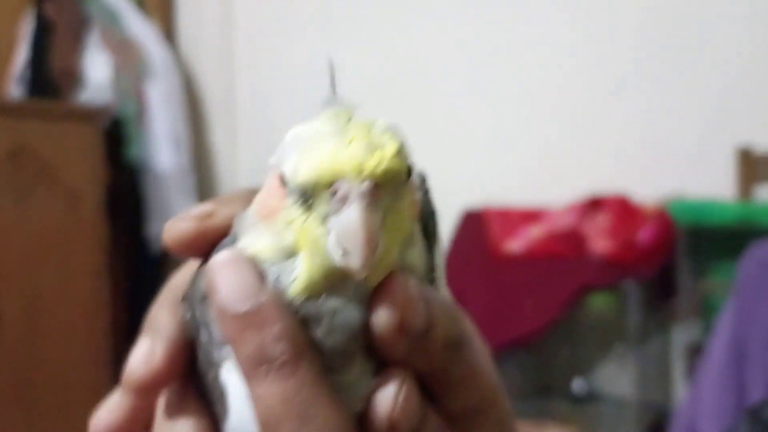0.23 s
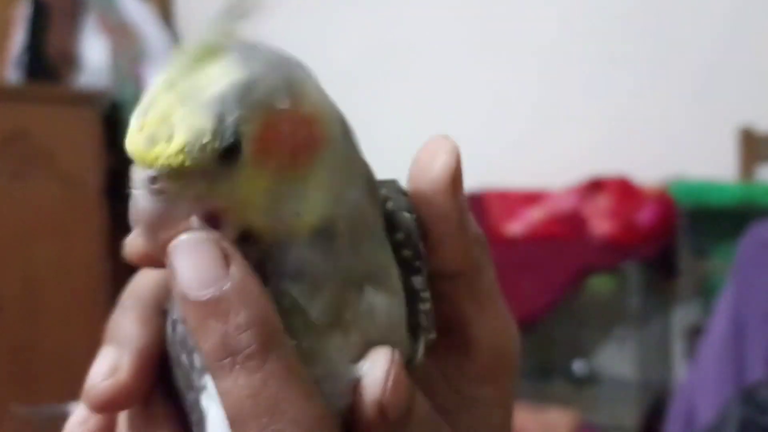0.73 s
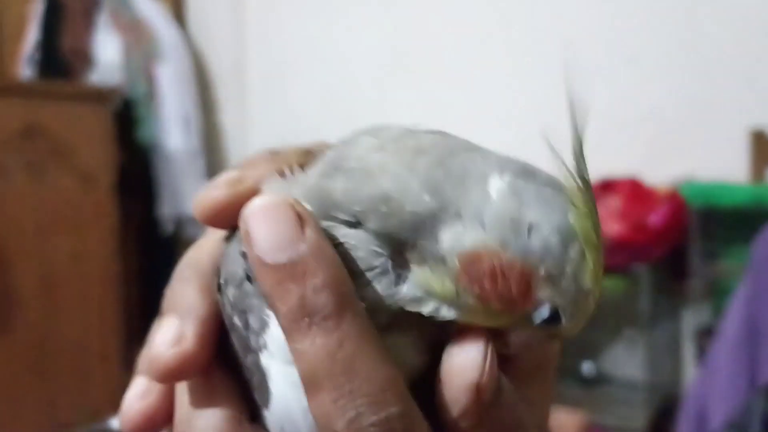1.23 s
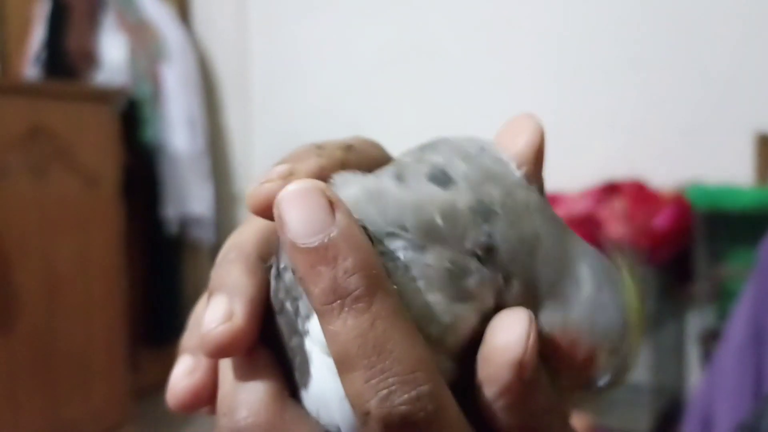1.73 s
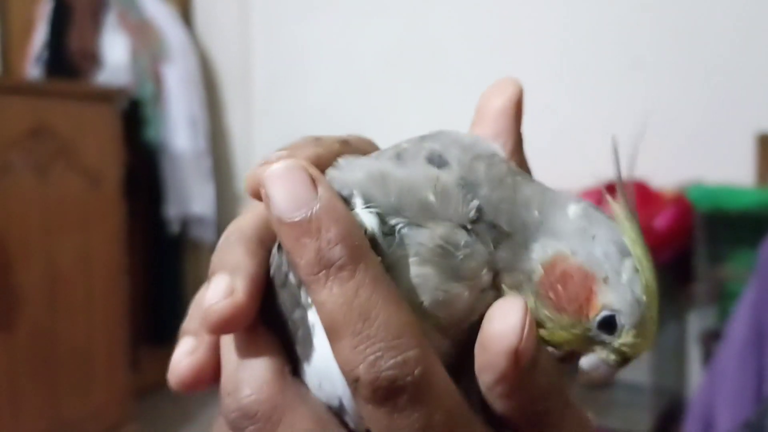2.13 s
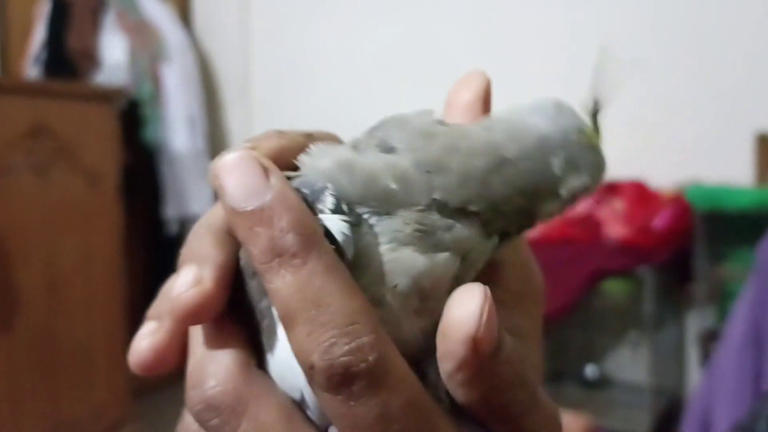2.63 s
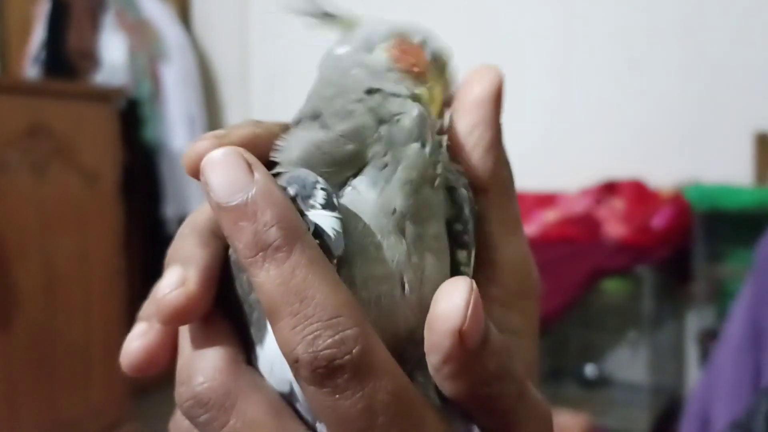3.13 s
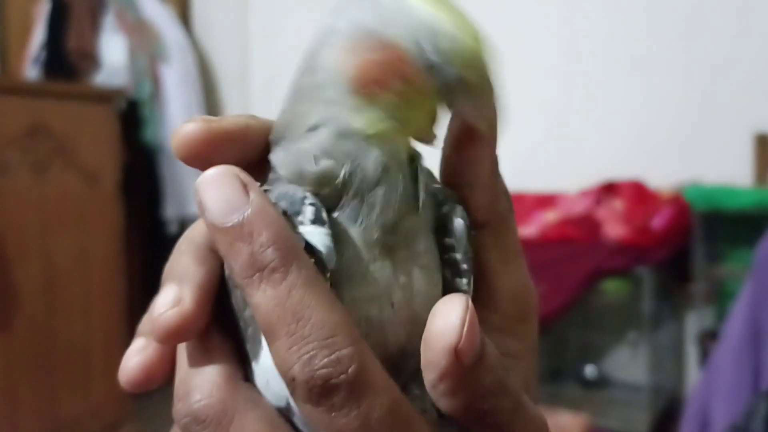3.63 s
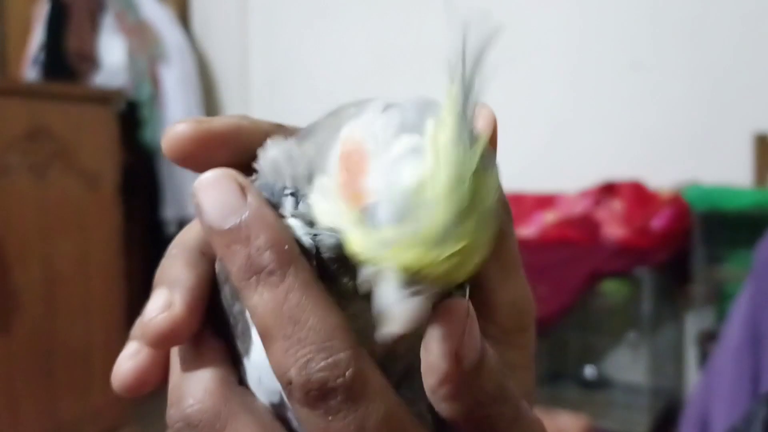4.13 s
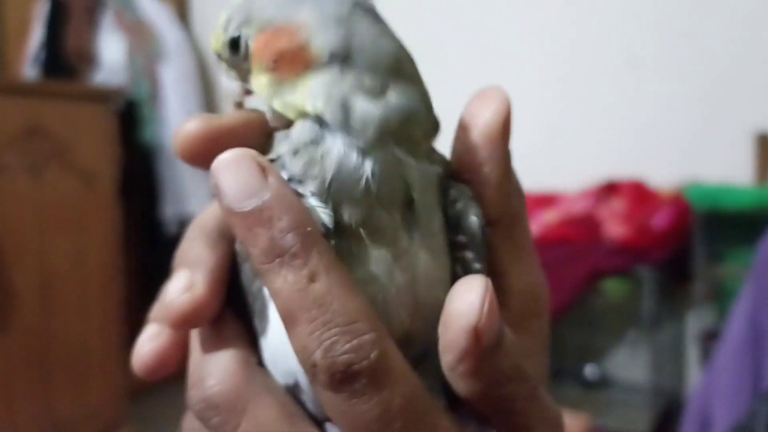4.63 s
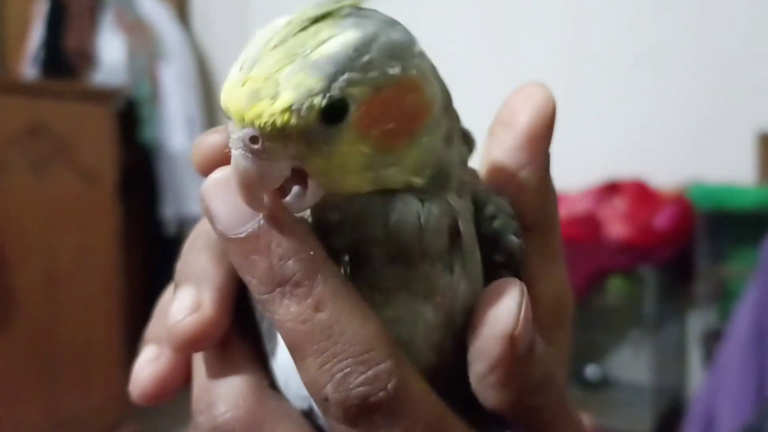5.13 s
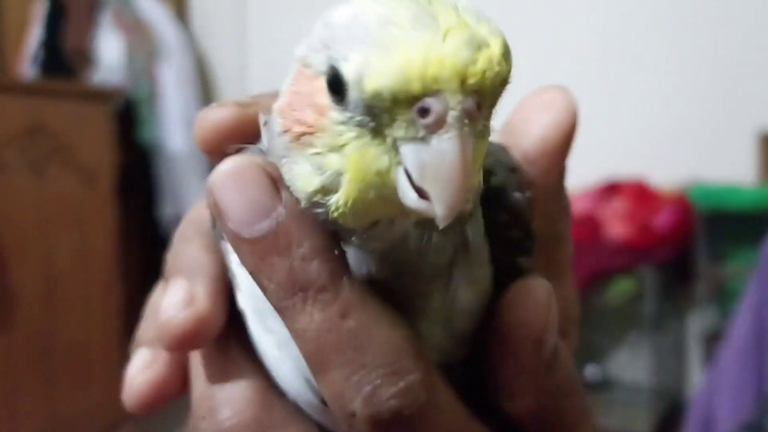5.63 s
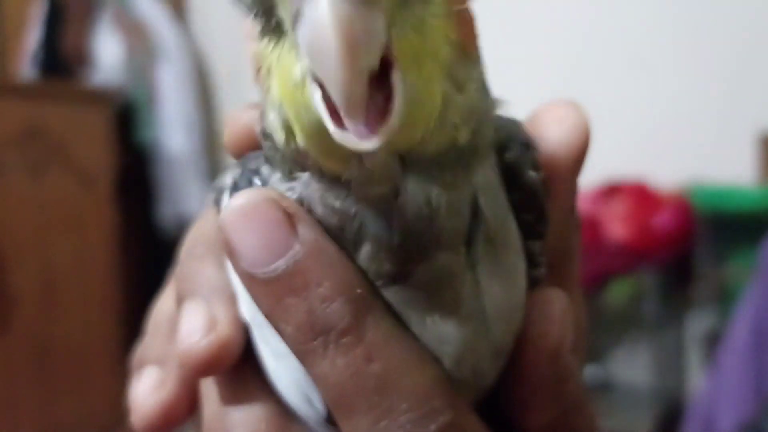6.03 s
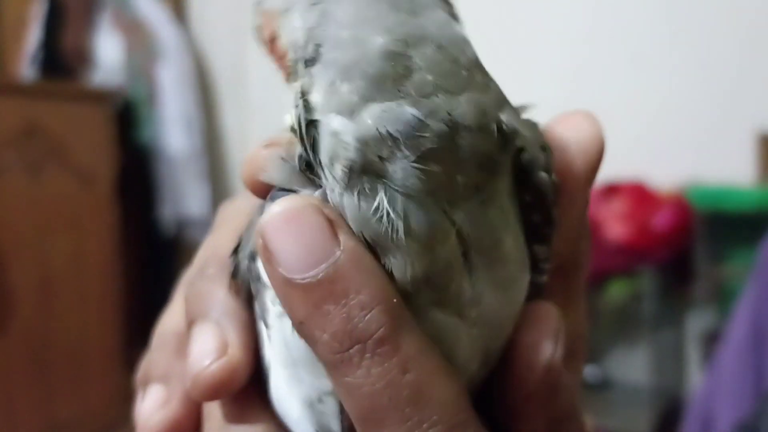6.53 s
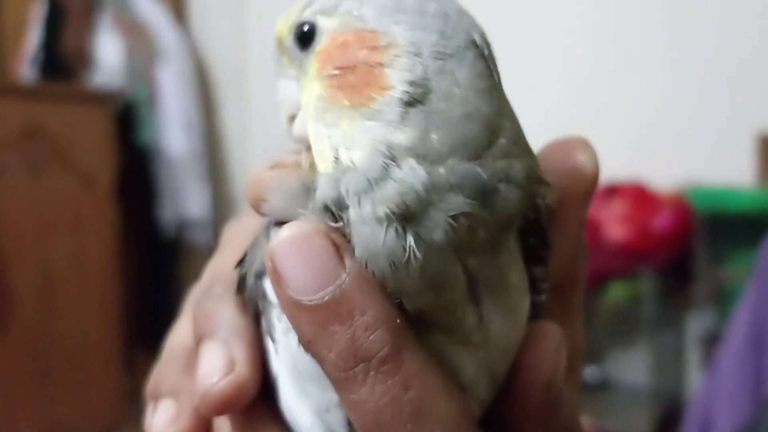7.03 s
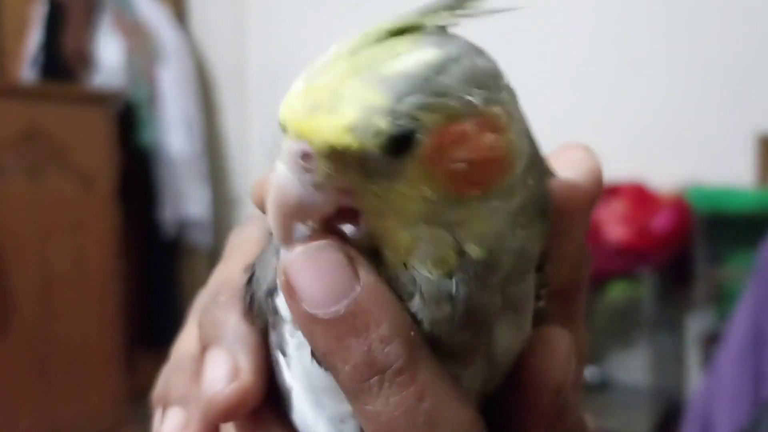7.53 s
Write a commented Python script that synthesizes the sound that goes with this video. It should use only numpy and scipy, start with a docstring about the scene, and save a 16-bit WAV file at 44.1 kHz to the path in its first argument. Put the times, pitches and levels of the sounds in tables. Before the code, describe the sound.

A cockatiel held in a hand gives one short, shrill, trilling squawk, then hisses in several breathy bursts, some starting with a tiny squeak. Near the end a swelling hiss runs into a harsh, broken squawk and a brief yelp. Light beak and claw ticks and faint feather rubbing fill the pauses. The microphone is close, in a small room with a low rumble.

```python
"""A small room: a hand-held cockatiel squawks, hisses in long bursts and squawks again, close by.
The hiss is air rushing through three throat resonances, with brief squeaks and thin wheezes;
the squawks are a fast trill of a harmonic voice. Beak and claws tick, feathers rub on the fingers,
and a faint whine falls slowly over the room's rumble."""
import sys
import numpy as np
from scipy import signal
from scipy.fft import rfft, irfft, next_fast_len
from scipy.io import wavfile
from scipy.ndimage import map_coordinates

SR = 44100
rng = np.random.default_rng(int(sys.argv[2]) if len(sys.argv) > 2 else 0)


def unload_wav(signal):
    """Save mono or channel-first audio to the path in sys.argv[1] as 16-bit WAV at rate SR, clipped to [-1, 1]."""
    wavfile.write(
        sys.argv[1],
        SR,
        np.round(np.clip(np.atleast_2d(signal).T, -1, 1) * 32767).astype(np.int16),
    )


N = 343098
TIME = np.arange(N) / SR
TOP_HZ = 15650

# Each row: start, end and attack in seconds; level, swell, brightening, middle resonance and
# high resonance in dB; resonance shift as a ratio; whistle peak and fizz in dB.
HISS_BURSTS = [(0.706, 0.725, .002, -32, -2, 0.5, -10.5, -2.5, 1.01, 5, 0),
               (0.756, 1.003, .018, -33, 0.5, 7.5, -5, -5.5, 1.02, 5, 2.5),
               (1.034, 1.714, .02, -31, -2, -1.5, 2.5, -0.3, 1.019, 3, 0),
               (1.991, 2.026, .01, -35.5, -2.5, -1, -3, -6, 0.91, -8.5, -5.5),
               (3.164, 4.023, 0.0023, -34.5, 6, 6, -1.5, -.5, 0.9894, 7.5, -7),
               (4.152, 4.17, 0.0053, -34.5, -0.5, 5.5, -7, -2, .99, -1, 2.5),
               (4.347, 4.962, 0.0019, -34, -1, 2, -3, -3, 1.012, 2.5, -3),
               (6.214, 6.459, .009, -34, -2, 6.5, -7.5, -7, .985, 0, -6),
               (6.506, 6.823, 0.072, -32, 9.5, 8.5, -0.5, -1, 1.015, 12, -7.5)]


def amp(db):
    return 10 ** (np.asarray(db) / 20)


def unit(x):
    return x / np.sqrt(np.mean(x ** 2) + 1e-20)


def along(points, hz):
    """(Hz, value) points, interpolated on a log axis."""
    knots_hz, values = np.transpose(points)
    return np.interp(np.log(hz + 1), np.log(knots_hz + 1), values)


def curves(rows, t=TIME):
    """Each column after the time, read at times t."""
    knots_s, *columns = np.transpose(rows)
    return [np.interp(t, knots_s, column) for column in columns]


def swells(rows, t=TIME):
    """One Gaussian bump per (centre s, half length s, height) row."""
    return sum(height * np.exp(-((t - s) / half) ** 2) for s, half, height in rows)


def wobble(knots_per_s):
    """Smooth random curve."""
    knots = rng.standard_normal(int(N * knots_per_s / SR) + 4)
    return map_coordinates(knots, [TIME * knots_per_s])


def filtered(x, response):
    """x through a complex frequency response."""
    size = next_fast_len(N + SR // 2)
    return irfft(rfft(x, size) * response(np.fft.rfftfreq(size, 1 / SR)), size)[..., :N]


def noise(spectrum):
    """Stereo noise of rms 1, alike in the bass, unrelated in the treble."""
    # Each row: frequency in Hz, left-right correlation.
    likeness = [(60, 0.89), (180, 0.86), (550, 0.65), (1650, -0.39), (4970, 0.019), (15000, -0.065)]

    def mid_side_gains(hz):
        angle = np.arccos(np.clip(along(likeness, hz), -1, 1)) / 2
        return amp(along(spectrum, hz)) * [np.cos(angle), np.sin(angle)]

    mid, side = filtered(rng.standard_normal((2, N)), mid_side_gains)
    return unit(np.array([mid + side, mid - side]))


def ports(hz, lead_ms, left_db):
    """Constant-power response of two microphone ports to a near source."""
    # The right port rings more near 4 and 6.5 kHz. Each row: frequency in Hz, left over right in dB.
    imbalance = [(750, 0), (1900, -4), (2800, -1.5), (3900, -13.5), (4900, -9), (6400, -14), (7600, -15.5),
                 (10500, 10.5), (14000, -1)]
    ratio = amp(along(imbalance, hz) + left_db)
    lead = np.exp(1j * np.pi * hz * lead_ms / 1000)
    return np.array([ratio * lead, 1 / lead]) * np.sqrt(2 / (1 + ratio ** 2))


def background(rumble_db=-53, air_db=-62):
    """The room at rest: low rumble, faint steady hiss."""
    # Each row: frequency in Hz, relative level in dB.
    rumble = [(15, -75), (25, -48), (59, -27.5), (72, -10.5), (91, 1.5), (284, -9.5), (440, -11.5),
              (500, -14), (551, -19.5), (659, -17.5), (1200, -23.5), (1560, -57.5), (2640, -120)]
    air = [(700, -20), (1300, -0.5), (2200, -2), (3200, -2), (4800, -13), (6500, -9), (7600, -19.5),
           (9500, -19), (12000, -11.5), (15500, -13)]
    return amp(rumble_db) * noise(rumble) + amp(air_db) * noise(air)


def voice(call, jitter, rasp_db, swing, dip_db=0, overtone_db=0, subharmonic_db=-60):
    """Pitch and brightness arch on each trill beat; harmonics sweep through the throat's resonances."""
    # Each row: frequency in Hz, gain in dB.
    tract = [(1400, -11), (2000, -7.5), (2900, -6.5), (3400, -8), (4150, 0.5), (4900, -7), (6200, -5),
             (7200, -16), (8300, -19), (9300, -34), (11500, -22.5), (15000, -35)]
    start, end = call[0][0], call[-1][0]
    crest_hz, level_db, beats_per_s = curves(call)
    trough = np.cos(np.pi * np.cumsum(beats_per_s * (TIME > start)) / SR) ** 2
    pitch_hz = crest_hz * (1 - swing * trough ** 1.1) * (1 + jitter * wobble(900))
    gate = np.clip(np.minimum(TIME - start, end - TIME) / 0.0019, 0, 1)
    on = gate > 0
    harmonic = np.arange(1, 9)[:, None]
    partial_hz = harmonic * pitch_hz[on]
    phase = 2 * np.pi * np.cumsum(pitch_hz[on]) / SR
    sag_db = dip_db * trough[on]
    effort_db = np.where(harmonic > 1, overtone_db - sag_db, -.45 * sag_db)
    gains = amp(along(tract, partial_hz) + effort_db) * (partial_hz < TOP_HZ)
    partials = gains * np.sin(harmonic * phase)
    # Air leaks past the membranes as a rasp, strongest at the onset.
    leak = rng.standard_normal(N)
    rasp = unit(filtered(leak, lambda hz: amp(along(tract, hz)) * hz ** 2 / (hz ** 2 + 900 ** 2)))
    onset_db = 13.5 * np.exp(-np.abs(TIME - start) / 0.033)
    sound = rasp * amp(rasp_db + onset_db)
    subharmonic = amp(subharmonic_db) * np.sin(phase / 2)  # uneven cycles
    sound[on] += partials.sum(axis=0) + subharmonic
    return sound * gate * amp(level_db)


def squawks():
    """A clear trill; later a harsh, broken one that ends in a yelp."""
    # Each row: time in seconds, top pitch in Hz, level in dB, trill beats per second.
    clear = [(.0165, 1460, -17.5, 87), (.05, 1809, -6.5, 88), (.082, 2056, -5.5, 65),
             (.125, 2103, -6.5, 86), (.161, 2136, -6.5, 79), (.178, 2050, -16.5, 72)]
    harsh = [(6.575, 1557, -21.5, 63), (6.597, 1768, -11, 71.4), (6.622, 2033, -6, 80),
             (6.644, 2207, -13, 51), (6.659, 2912, -12.5, 44), (6.669, 2135, -15.5, 43),
             (6.682, 2056, -11, 44), (6.704, 1864, -12.5, 46.6), (6.725, 1782, -20.5, 48),
             (6.766, 1684, -17.5, 48), (6.79, 1710, -32, 48)]
    yelp = [(6.829, 1835, -10, 61.3), (6.853, 1692, -15, 61.6)]
    calls = voice(clear, jitter=.008, rasp_db=-33, swing=.15, dip_db=11.5)
    calls += voice(harsh, jitter=.018, rasp_db=-22, swing=.14, dip_db=10.5, subharmonic_db=-32.5)
    calls += voice(yelp, jitter=.018, rasp_db=-25.5, swing=.04, overtone_db=-8.5)
    return filtered(calls, lambda hz: ports(hz, lead_ms=-.15, left_db=0))


def clicks(rows, spectrum, t60_s):
    """Tiny contacts: cracks of noise that die at once."""
    envelope = sum(amp(db - 60 * np.abs(TIME - s) / t60_s) * (TIME >= s) for s, db in rows)
    return envelope * noise(spectrum)


def ticks():
    """Beak and claws tick sharply; the tongue unsticks with a lower click as a hiss begins."""
    # Each row: time in seconds, relative level in dB.
    contacts = [(0.3055, -33.5), (1.7729, -26), (2.1072, -42), (2.6835, -47), (2.81, -37), (5.1406, -27.5),
                (6.0897, -29.5), (7.623, -34.5), (7.6925, -42.5), (7.7255, -43)]
    tongue = [(.705, -38), (3.163, -47.5), (4.147, -41.5), (4.3425, -35.5), (6.2055, -28.5)]
    # Each row: frequency in Hz, relative level in dB.
    beak = [(300, -12.5), (1500, -3), (4000, -4), (6500, 0), (9000, -12.5), (12000, 2.5), (16000, -9)]
    mouth = [(300, -29.5), (900, -4.5), (1600, -1), (3300, 2.5), (4800, -5), (7000, -6.5), (9000, -25.5),
             (15000, -27.5)]
    return amp(-1) * clicks(contacts, beak, t60_s=.007) + clicks(tongue, mouth, t60_s=.0066)


def handling(grain_db=4):
    """Feather barbs catch on the skin in grains; the grip shifts once with a low rub."""
    # Each row: centre and half length in seconds, level in dB.
    rubs = [(.32, 0.03, -55), (.655, 0.049, -54.5), (1.8, 0.023, -60.5), (2.12, 0.028, -61),
            (4.11, 0.005, -53.5), (5.06, 0.071, -52.5), (5.19, 0.0154, -56), (5.41, 0.088, -61),
            (6.125, 0.039, -51.5), (7.7, 0.068, -58.5)]
    grip_shifts = [(.89, .11, -43)]
    # Each row: frequency in Hz, relative level in dB.
    feathers = [(500, -27), (2400, -1.5), (4600, -10), (6200, 1.5), (8000, -13.5), (12300, -4),
                (16000, -16)]
    grip = [(40, -49), (110, -8.5), (170, 2.5), (260, -10.5), (600, -10.5), (2000, -60.5)]

    def strokes(rows):
        return swells([(s, half, amp(db)) for s, half, db in rows])

    grains = unit(noise(feathers) * amp(grain_db * wobble(550)))
    return strokes(rubs) * grains + strokes(grip_shifts) * noise(grip)


def squeaks(beats_per_s=62):
    """The voice catches in a short, rough glide as the air starts or stops."""
    # Each row: start and length in seconds, pitch and glide in Hz, level in dB.
    catches = [(0.705, .03, 1450, 62.5, -22.5), (3.167, .03, 1470, 90, -34), (4.149, .03, 1490, 87, -23.5),
               (4.343, .028, 1380, 243.5, -19.5), (4.997, .016, 2140, -190, -23)]
    sound = 0
    for start, length, pitch_hz, glide_hz, db in catches:
        call = [(start, pitch_hz, db, beats_per_s), (start + length, pitch_hz + glide_hz, db, beats_per_s)]
        sound += voice(call, jitter=.02, rasp_db=-31.5, swing=.03, overtone_db=-20, subharmonic_db=-26.5)
    return filtered(sound, lambda hz: ports(hz, lead_ms=.2, left_db=2.5))


def airflow(bursts, release_db_per_s=521.5):
    """Gain of the breath: each burst rises, swells or sags evenly, then stops quickly."""
    flow = 0
    for start, end, attack_s, level_db, swell_db, *_ in bursts:
        rise = 1 - np.exp(-np.maximum(TIME - start, 0) / attack_s)
        progress = np.clip((TIME - start) / (end - start), 0, 1) - .5
        release_db = release_db_per_s * np.maximum(TIME - end, 0)
        flow += rise * amp(level_db + swell_db * progress - release_db)
    return flow


def throat_setting(t):
    """Each hiss has its own throat shape; its brightness ramps from start to end."""
    knots = []
    for start, end, _, _, _, bright_db, middle_db, high_db, *held in HISS_BURSTS:
        for s, tilt_db in ((start, -bright_db / 2), (end, bright_db / 2)):
            knots.append((s, middle_db + tilt_db, high_db + tilt_db, *held))
    return curves(knots, t)


def hand_echo(hz, t, delay_s=0.001418, wander=0.13, echo_db=-9):
    """A close echo off the fingers ripples the spectrum; its delay wanders at random."""
    drift = np.array([np.interp(t, TIME, wobble(3)) for port in range(2)])
    lag_s = delay_s * (1 + wander * drift)
    echo = amp(echo_db) * np.exp(-2j * np.pi * hz * lag_s[:, None])
    return (1 + echo) / np.hypot(1, amp(echo_db))


def hiss(flutter_db=-0.26, waver=0.017, whistle_hz=1660, whistle_width_hz=140, fizz_hz=9000):
    """Turbulent air through three sliding throat resonances; more effort is brighter."""
    # Low, middle and high resonance. Each point: frequency in Hz, gain in dB.
    resonances = [
        [(150, -32), (450, -20), (750, -12), (1150, -2.5), (1350, -8.5), (1700, -1), (2150, -4), (2900, -8.5),
         (4000, -53.5)],
        [(1800, -54.5), (3000, -13.5), (3600, -2.5), (4100, -3), (4700, -19), (6500, -53)],
        [(3500, -61), (5100, -11), (5900, -3), (6650, 3.5), (7300, -9), (8300, -34.5), (9000, -27.5),
         (10300, -14.5), (11300, -25.5), (13300, -18.5), (15500, -45)],
    ]
    # Share of the sink that each resonance follows.
    sink_shares = (.25, 0.3, 0.8)
    # The bird pushes or eases off. Each row: centre and half length in seconds, effort in dB.
    pushes = [(.945, 0.021, 3.5), (1.115, 0.029, 3.5), (1.24, 0.014, -1.5), (1.6, 0.027, -2),
              (3.41, 0.043, 2), (3.54, 0.05, -2.5), (3.85, 0.062, 2.5), (4.52, 0.12, 5),
              (4.71, 0.036, -3.5), (6.72, 0.014, -3)]
    # The beak narrows. Each row: centre and half length in seconds, sink as a fraction of frequency,
    # change of the high resonance in dB.
    narrowings = [(1.44, 0.23, 0.091, -4.5), (1.512, 0.05, 0.077, -9.5), (2.03, 0.044, 0.21, -1),
                  (3.182, .065, 0.2, -16.5), (3.41, 0.081, 0.056, 1.5), (4.51, .06, 0.11, -7),
                  (4.84, 0.11, 0.051, -1)]
    # The fizz flares. Each row: centre and half length in seconds, boost in dB.
    sprays = [(1.67, .06, 12), (3.9, 0.26, 5)]
    # Where the head points. Each row: time in seconds, left lead in ms, left over right in dB.
    head = [(.95, .27, 6.5), (1.27, .11, -1.7), (2.02, .055, -1.5), (3.2, 0.14, 0.1), (4.15, .135, 0.5),
            (4.5, .23, 5), (6.5, .31, 7), (6.6, -.12, 1), (6.8, -.15, 0)]

    jet = rng.standard_normal(N) * airflow(HISS_BURSTS) * amp(swells(pushes) + flutter_db * wobble(70))
    hz, t, jet_spectra = signal.stft(jet, SR, nperseg=256)
    hz = hz[:, None]
    middle_db, high_db, shift, whistle_db, fizz_db = throat_setting(t)
    push_db = swells(pushes, t)
    sink = swells([(s, half, share) for s, half, share, _ in narrowings], t)
    narrow_db = swells([(s, half, db) for s, half, _, db in narrowings], t)
    middle_db += 0.73 * push_db
    high_db += 0.77 * push_db + narrow_db
    fizz_db += swells(sprays, t) - .5 * narrow_db  # fizz escapes half the dulling
    shift *= 1 + .006 * push_db + waver * np.interp(t, TIME, wobble(25))
    fizz_band = 1 / (1 + np.exp((fizz_hz - hz) / 400))  # made at the beak's edge, so it does not sink
    power = 0
    for shape, db, share in zip(resonances, (0, middle_db, high_db), sink_shares):
        throat_hz = hz / (shift * (1 - share * sink * (1 - fizz_band)))
        # A tight throat adds a half-whistled peak.
        peak_db = whistle_db / (1 + ((throat_hz - whistle_hz) / whistle_width_hz) ** 2)
        resonance = amp(along(shape, throat_hz) + peak_db + fizz_db * fizz_band) ** 2
        surge_db = 0.56 * np.interp(t, TIME, wobble(22))  # the jet feeds each resonance unevenly
        power += amp(db + surge_db) ** 2 * resonance / resonance.mean(axis=0)
    spectra = jet_spectra * np.sqrt(power) * ports(hz, *curves(head, t)) * hand_echo(hz, t)
    return signal.istft(spectra, SR, nperseg=256)[1][:, :N]


def whine(width_hz=100):
    """A faint, far tone sinks and grows, blurred and broken up by reflections."""
    # Each row: time in seconds, pitch in Hz, level in dB.
    glide = [(2.1, 1620, -78), (3, 1491, -74.5), (5.2, 1014, -73.5), (6, 902, -68), (7.15, 675, -64.5),
             (7.45, 507.5, -59), (7.72, 461, -66)]
    pitch_hz, level_db = curves(glide)
    fading = wobble(width_hz) + 1j * wobble(width_hz)
    tone = np.real(fading * np.exp(2j * np.pi * np.cumsum(pitch_hz) / SR))
    return amp(level_db) * unit(tone) * (TIME > glide[0][0])


def wheezes(flutter_db=2):
    """A thread of air flutters through the nearly closed beak."""
    # Each row: start, end and attack in seconds, level and swell in dB.
    breaths = [(2.93, 3.502, 0.046, -47, 10), (6.965, 7.451, 0.0404, -62.5, -7.5)]
    # Each row: frequency in Hz, relative level in dB.
    beak_gap = [(2200, -29), (2580, -10.5), (2780, -19.5), (2980, 3.5), (3170, -16), (3350, 0.5),
                (3550, -11), (3800, -24.5), (5000, -42)]
    return airflow(breaths) * amp(flutter_db * wobble(45)) * noise(beak_gap)


def room(x, early_db=-13, tail_db=-16, early_t60_s=0.13):
    """Hand and furniture reflect at once; the walls add a short tail."""
    # Each row: frequency in Hz, time to decay 60 dB in seconds.
    wall_t60 = [(200, 0.57), (2000, .38), (5000, 0.34), (12000, 0.37)]
    hz, t, spectra = signal.stft(rng.standard_normal((2, SR // 2)), SR, nperseg=256)
    decay = amp(-60 * t / along(wall_t60, hz)[:, None])
    tail = signal.istft(spectra * decay, SR, nperseg=256)[1]
    age_s = np.arange(tail.shape[1]) / SR
    tail *= age_s > .006
    early = rng.standard_normal(tail.shape) * amp(-60 * age_s / early_t60_s) * (age_s > .001)
    impulse = amp(early_db) * early / np.linalg.norm(early[0])
    impulse += amp(tail_db) * tail / np.linalg.norm(tail[0])
    return signal.fftconvolve(x, impulse, axes=1)[:, :N]


def scene():
    """The bird, its reflections and the quiet background."""
    bird = hiss() + squawks() + squeaks() + wheezes() + ticks() + handling()
    return bird + room(bird) + whine() + background()


def record(dry):
    """Clip at full scale, then cut everything above TOP_HZ."""
    return filtered(np.clip(dry, -1, 1), lambda hz: hz < TOP_HZ)


dry = scene()
out = record(dry)
unload_wav(out)
```